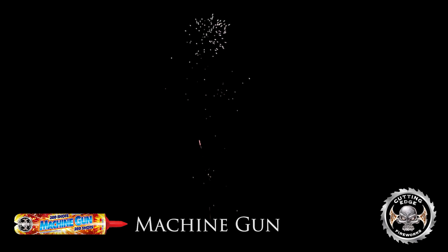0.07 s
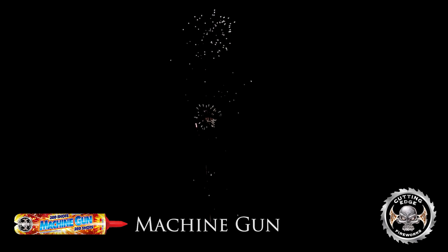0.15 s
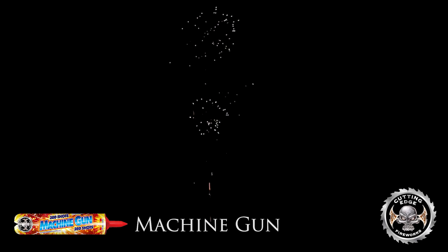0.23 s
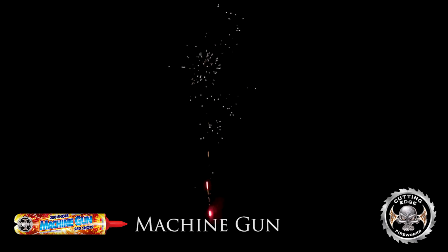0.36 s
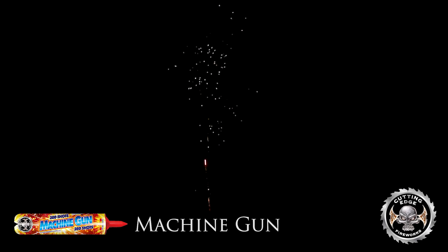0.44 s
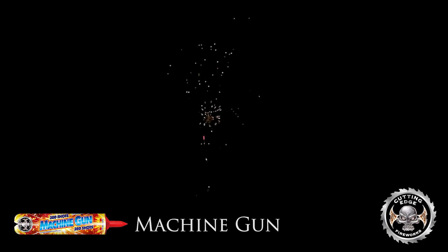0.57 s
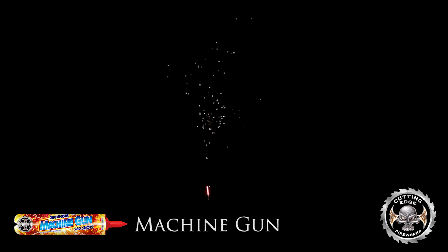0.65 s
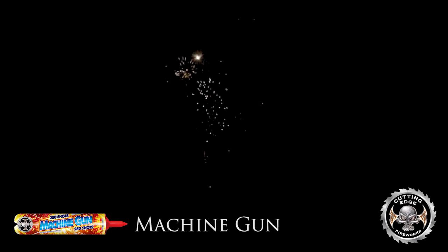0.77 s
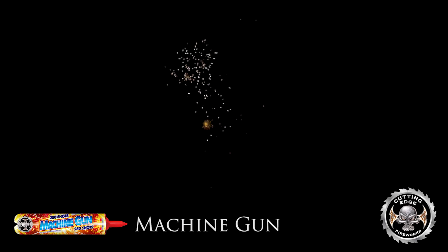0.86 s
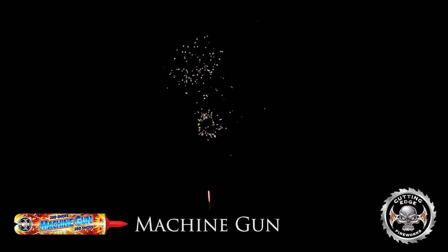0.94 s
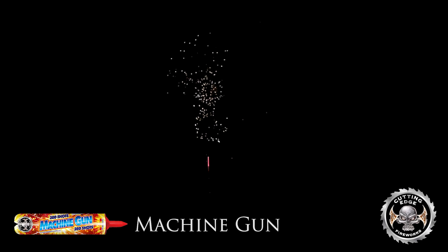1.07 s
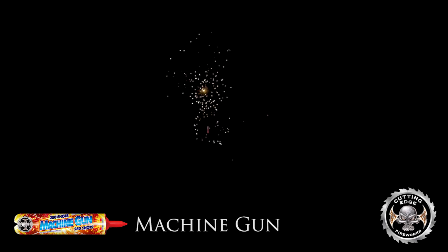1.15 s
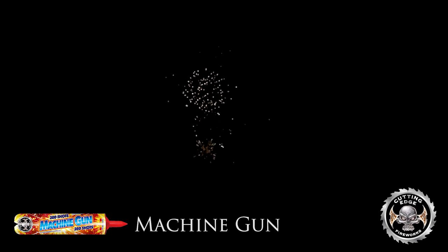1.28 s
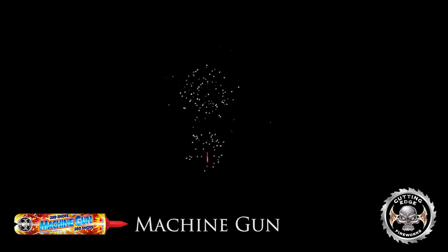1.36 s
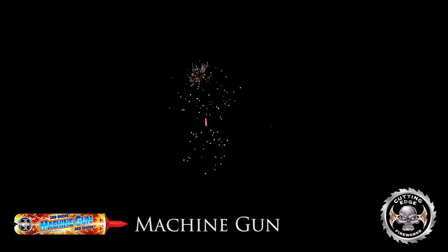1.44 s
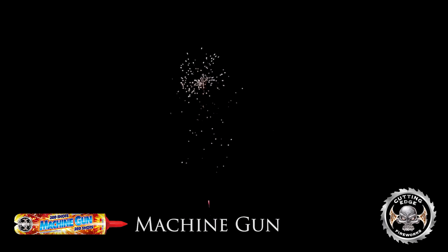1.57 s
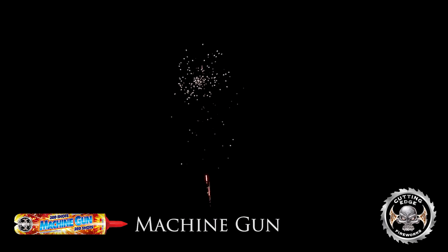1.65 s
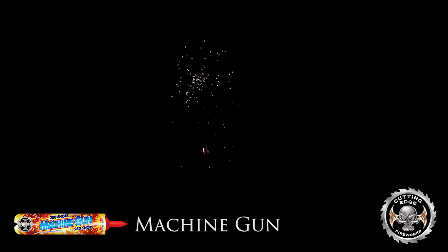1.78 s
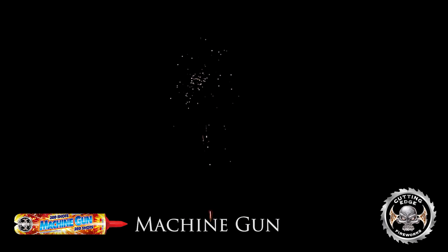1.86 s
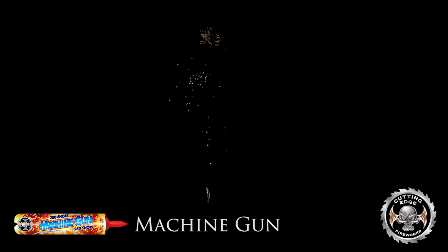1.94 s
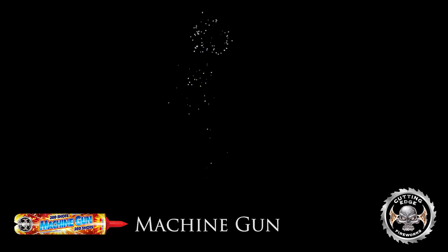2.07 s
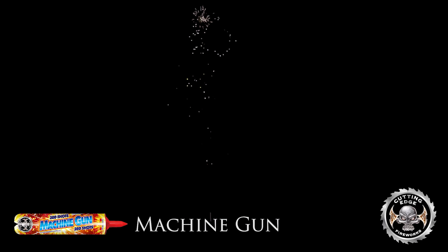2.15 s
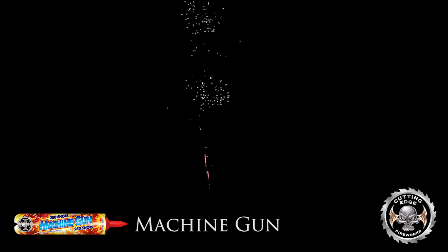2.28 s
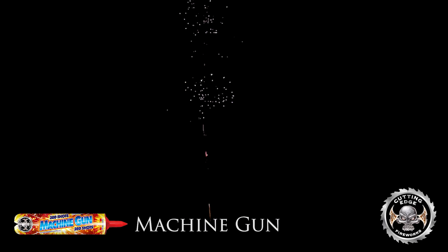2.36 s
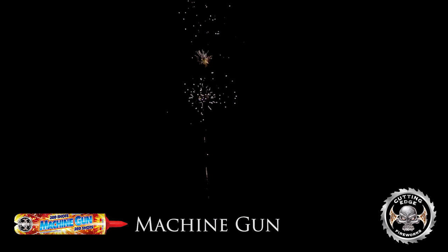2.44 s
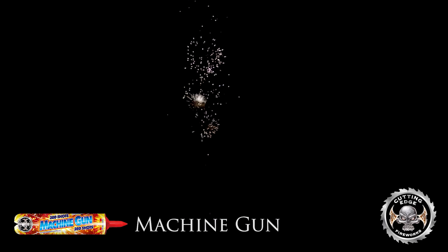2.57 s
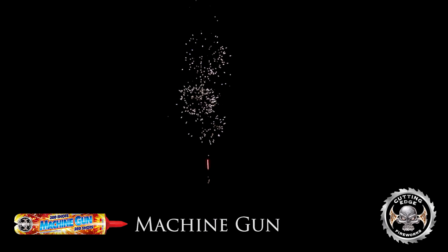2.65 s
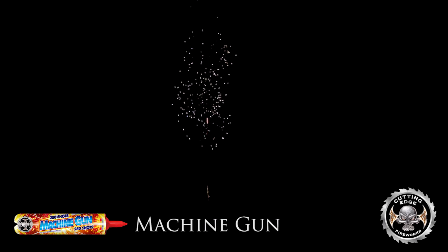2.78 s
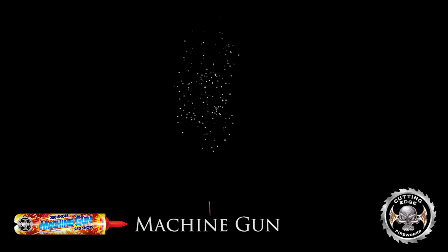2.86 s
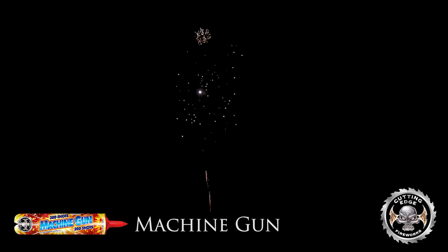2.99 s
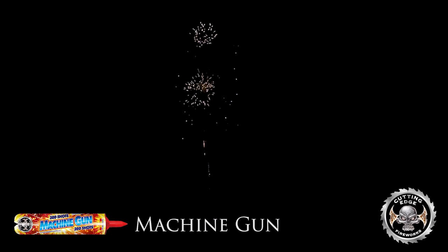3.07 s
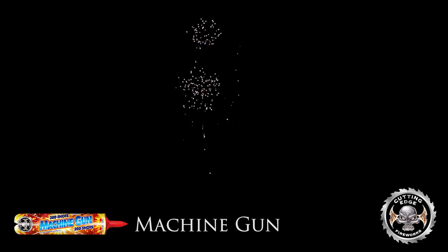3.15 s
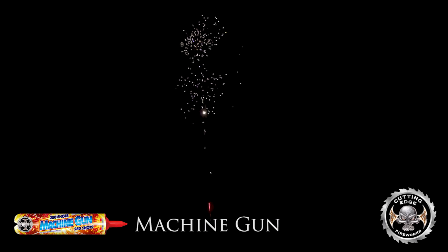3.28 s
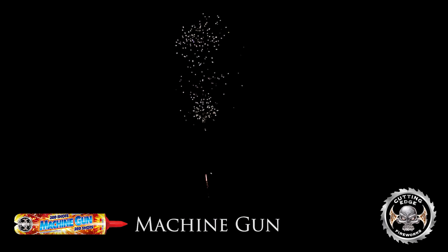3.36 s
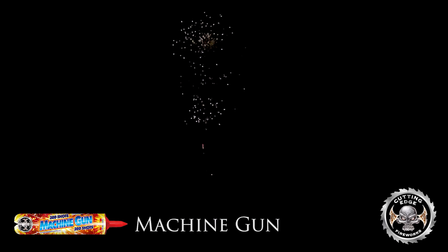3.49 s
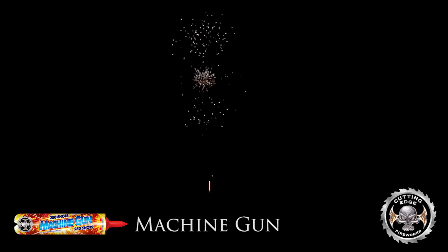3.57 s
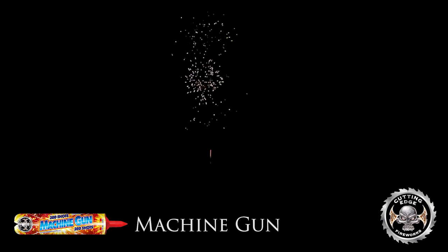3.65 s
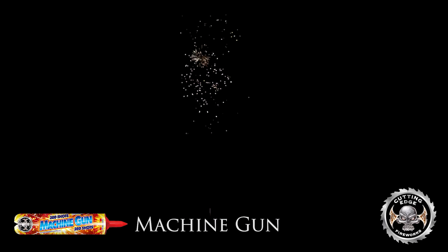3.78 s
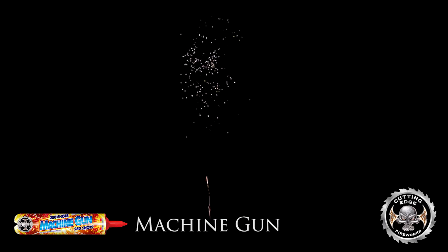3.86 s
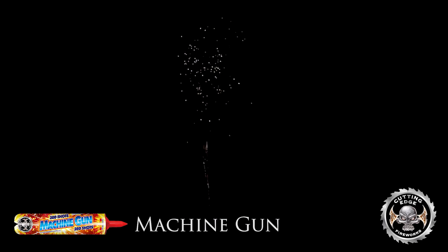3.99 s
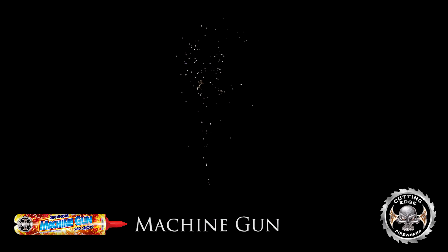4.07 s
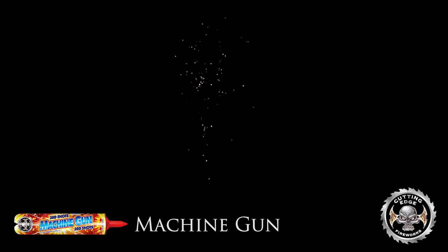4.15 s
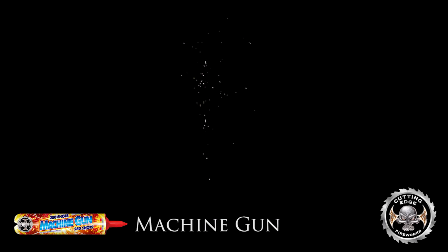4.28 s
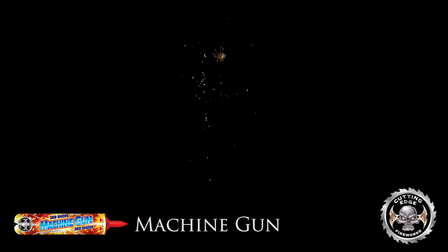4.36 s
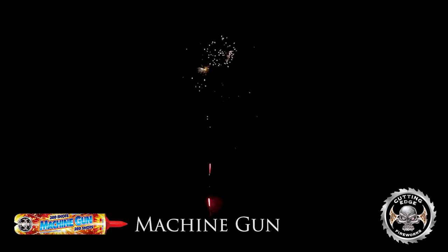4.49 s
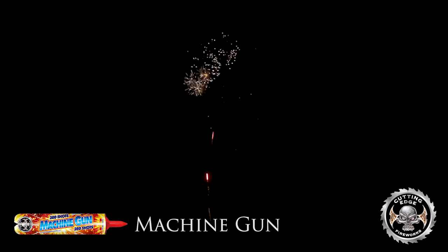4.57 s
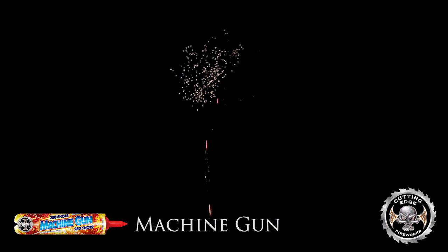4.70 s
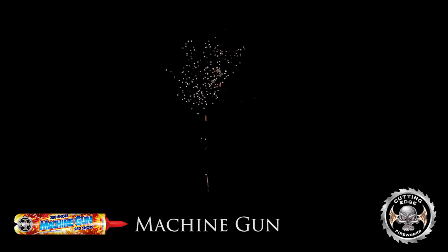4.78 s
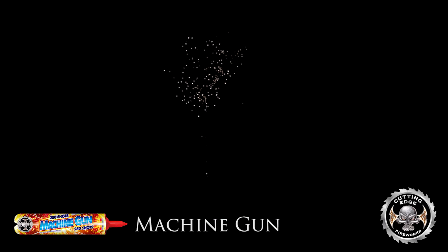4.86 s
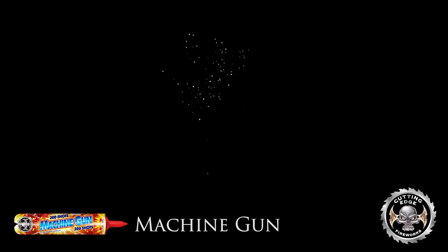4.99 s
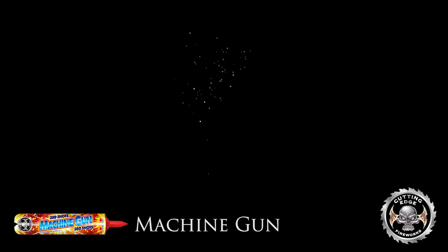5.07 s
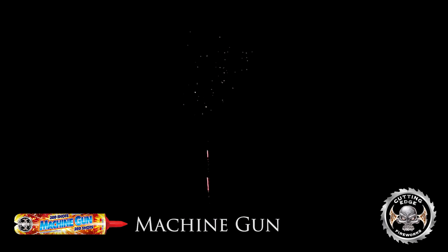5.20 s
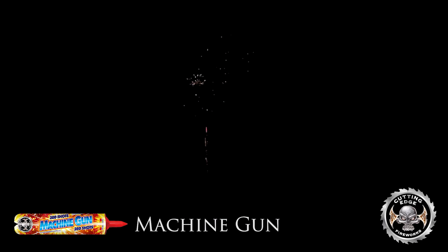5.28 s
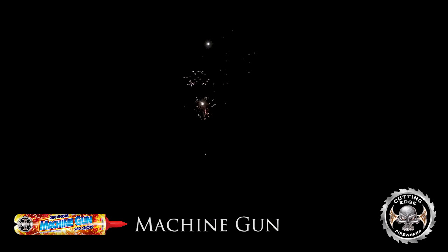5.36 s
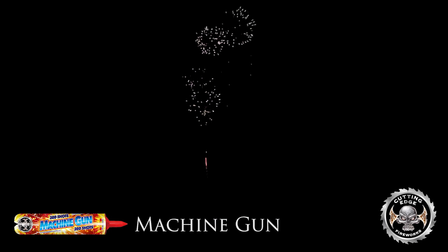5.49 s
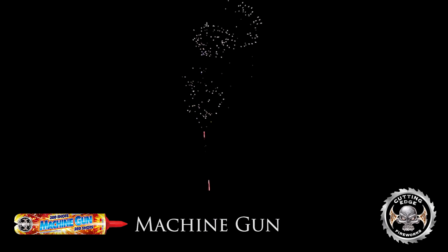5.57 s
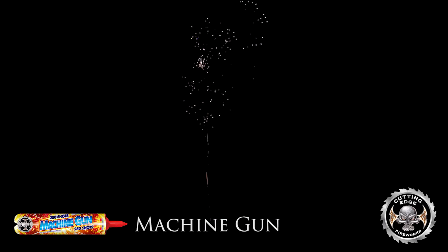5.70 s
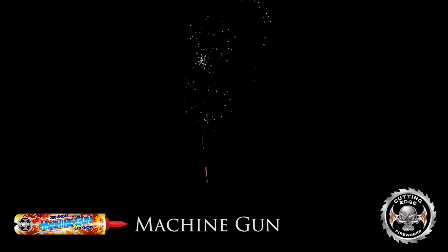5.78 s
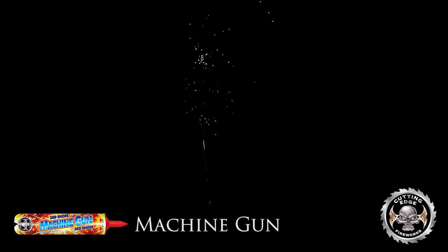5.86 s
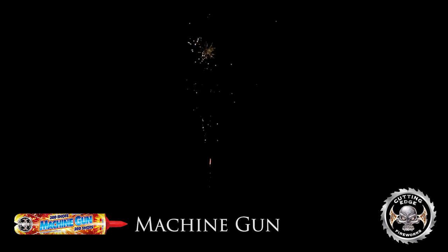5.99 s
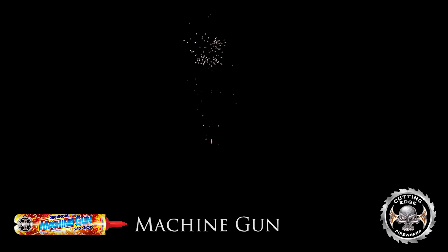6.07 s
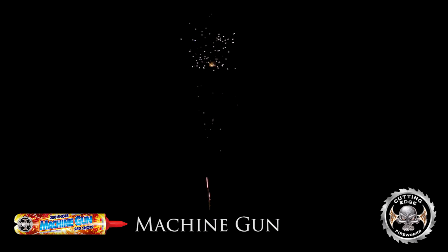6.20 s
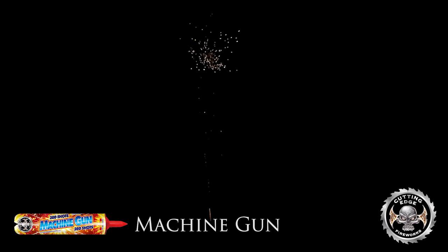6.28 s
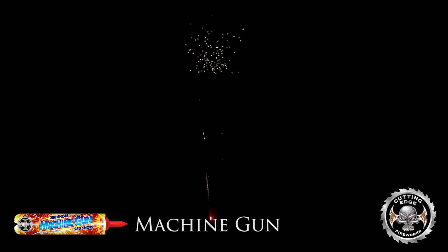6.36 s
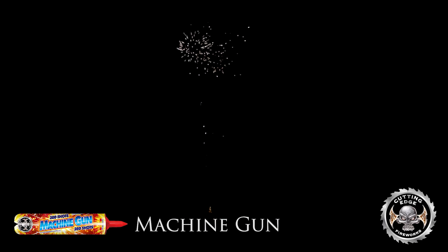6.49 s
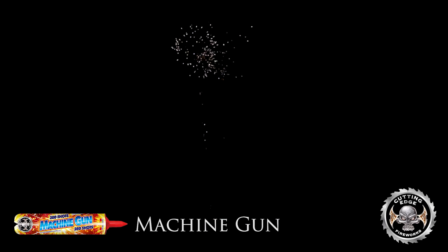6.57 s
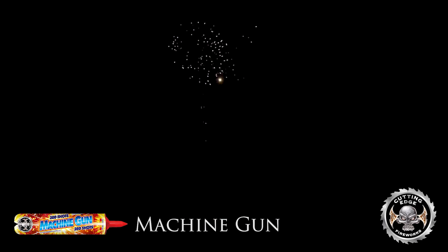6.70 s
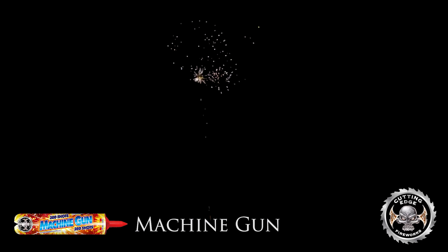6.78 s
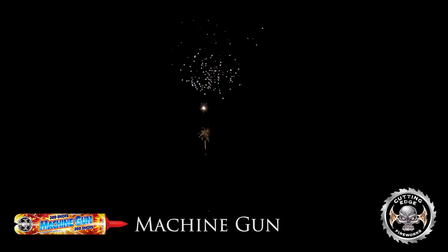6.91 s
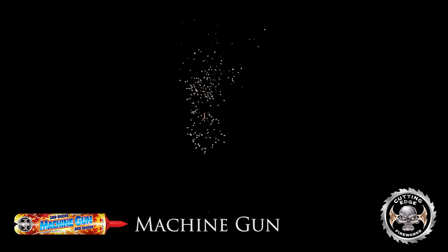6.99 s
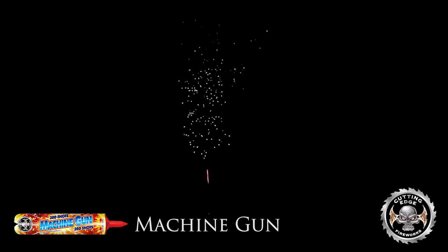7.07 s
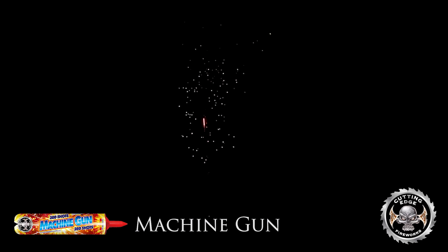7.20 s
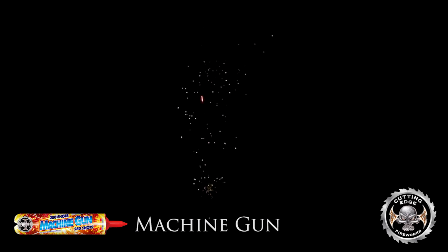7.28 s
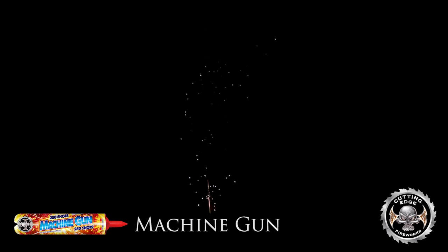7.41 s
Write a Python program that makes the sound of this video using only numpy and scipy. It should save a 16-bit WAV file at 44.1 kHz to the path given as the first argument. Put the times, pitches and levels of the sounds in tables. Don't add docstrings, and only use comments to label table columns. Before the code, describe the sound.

A rapid, uneven barrage of small firework bursts runs throughout, heard from fairly near in an open field with trees. Dull launching thumps and short hissing spits mix with sharp, clipped cracks, quick ground echoes and a short leafy tail. Fine crackle swells twice after bursts. Activity thins briefly around the middle and later, then continues to the end over faint insects and light wind buffeting.

```python
import sys
import numpy as np
from scipy import signal
from scipy.fft import rfft, irfft
from scipy.io import wavfile
from scipy.ndimage import uniform_filter1d

SR = 44100
rng = np.random.default_rng(int(sys.argv[2]) if len(sys.argv) > 2 else 0)


def digitize_waveform(pressure):
    field = np.atleast_2d(pressure).T
    bounded = np.clip(field, -1, 1)
    quanta = np.round(bounded * 32767).astype(np.int16)
    wavfile.write(sys.argv[1], SR, quanta)


def natural_amplitude(level_db):
    exponent = np.asarray(level_db, float) / 20
    return 10 ** exponent


N = 328104


def rms_one(x):
    return x / np.sqrt(np.mean(x ** 2) + 1e-20)


def coloured(x, spectrum):
    hz, db = np.transpose(spectrum)
    grid = np.arange(x.shape[-1] // 2 + 1) * SR / x.shape[-1] + 1
    gain = natural_amplitude(np.interp(np.log(grid), np.log(hz), db))
    return rms_one(irfft(rfft(x) * gain, x.shape[-1]))


def add(track, s, sound):
    at = max(int(round(s * SR)), 0)
    track[at:at + len(sound)] += sound[:N - at]


def peak(x, hz, width_hz):
    r = np.exp(-np.pi * width_hz / SR)
    poles = [1, -2 * r * np.cos(2 * np.pi * hz / SR), r * r]
    return signal.lfilter([(1 - r * r) / 2, 0, (r * r - 1) / 2], poles, x)


def drift(rate_hz):
    slow = signal.butter(2, rate_hz, fs=SR, output="sos")
    return rms_one(signal.sosfilt(slow, rng.standard_normal(N + SR))[SR:])


def grit(shape, per_s, spread_db):
    sizes = natural_amplitude(spread_db * np.minimum(rng.exponential(1, shape), 5)) * rng.choice([-1, 1], shape)
    return sizes * (rng.random(shape) < per_s / SR)


def shock(push_ms, suction, back_ms):
    ms = np.arange(300) / SR * 1000
    late = np.maximum(ms - push_ms, 0)
    push = np.minimum(1, ms / .04) * np.maximum(1 - ms / push_ms, 0)
    return push - suction * (1 - np.exp(-late / .07)) * np.exp(-late / back_ms)


# (frequency [Hz], level [dB])
NIGHT_COLOUR = [(30, -1), (70, -9), (110, -30), (300, -12.5), (600, -44), (2000, -12), (4000, -26),
                (9000, -18.5), (12500, -27), (15600, -16), (15800, -40), (16100, -70)]


def night_air():
    return natural_amplitude(-49) * coloured(rng.standard_normal(N), NIGHT_COLOUR)


def crickets():
    trill_db, buzz_db = -49.5, -45
    t = np.arange(N) / SR
    pulses = np.maximum(np.sin(2 * np.pi * 40 * t + 1.5 * drift(3)), 0) + .9
    one_voice = np.sin(2 * np.pi * 2640 * t + 3 * drift(20))
    many_voices = .8 * rms_one(peak(rng.standard_normal(N), 2630, 260))
    trill = rms_one(peak((one_voice + many_voices) * pulses, 2550, 280))
    strokes = (.5 + .5 * np.sin(2 * np.pi * 180 * t + 1.2 * drift(2.6))) ** 2 + 1.2
    rasp = rng.standard_normal(N) * strokes
    buzz = rms_one(peak(peak(peak(rasp, 6380, 1300), 6460, 2000), 6600, 2600))
    return natural_amplitude(trill_db + 0.78 * drift(0.83)) * trill + natural_amplitude(buzz_db + 0.21 * drift(10.0)) * buzz


# (time [s], level [dB])
GUSTS = [(0.0, -36.5), (0.33, -41), (0.76, -47.5), (0.99, -47), (2.05, -62), (3.13, -39), (3.479, -52),
         (4.56, -62), (4.79, -41), (4.99, -51), (5.16, -51), (5.37, -51), (5.49, -37), (5.88, -60),
         (6.48, -48.5), (6.78, -54), (7.19, -40), (7.44, -43)]
# (time [s], level [dB], frequency [Hz])
SLAPS = [
    (0.83, -29.5, 33.5),
    (7.33, -30, 47),
    (7.383, -20.5, 85.5),
    (7.39, -31, 190),
]


def wind():
    gust_db = np.interp(np.arange(N) / SR, *np.transpose(GUSTS))
    rumble = coloured(rng.standard_normal(N), [(8, 5.5), (25, -5.0), (60, -8.0), (120, -18.5), (400, -39.0)])
    out = natural_amplitude(gust_db + 9.56 * drift(7.7)) * rumble
    t = np.arange(6000) / SR
    for s, slap_db, hz in SLAPS:
        add(out, s, -natural_amplitude(slap_db + 2.0) * np.sin(2 * np.pi * hz * t) * np.exp(-t * hz / 2.0))
    return out


# (time [s], thump level [dB], spit level [dB], spit frequency [Hz], spit length [ms]); the faint
# row at 4.303 s only lays a soft thump and spit under a clump of pops
LIFT_CHARGES = [(0.039, -25, -36.5, 3530, 23), (0.1401, -21, -34, 1980, 11.3),
                (0.153, -22.5, -30, 1940, 8.5), (0.3312, -19.5, -27, 3600, 7.1),
                (0.405, -26, -38.5, 2300, 10), (0.4974, -27.5, -40, 2100, 19),
                (0.5317, -28, -33.5, 2250, 3.9), (0.854, -21.5, -32, 2080, 11),
                (1.1723, -19, -24, 3670, 3.9), (1.2404, -20.5, -26.5, 1840, 8.2),
                (1.53, -19.5, -27, 2420, 7.6), (1.788, -27, -41, 2400, 24), (1.855, -26.5, -36, 4770, 13),
                (1.866, -29, -36, 1920, 5),
                (2.1031, -28.5, -40, 2130, 24), (2.121, -25.5, -39, 2200, 24), (2.435, -22, -30, 4270, 11),
                (2.6154, -23, -26.5, 6400, 8.2), (2.643, -20, -25, 1730, 6.1),
                (2.8226, -25.5, -35, 1300, 6.7), (2.9462, -26, -34.5, 3970, 11),
                (3.106, -19, -24.5, 6100, 4.5), (3.176, -23.5, -28.5, 3970, 11),
                (3.225, -20, -28, 2150, 11), (3.7751, -23.5, -36, 2100, 12), (4.106, -21, -28.5, 1870, 7.1),
                (4.119, -24, -29, 6300, 11), (4.1835, -24.5, -26.5, 3770, 8.5), (4.303, -41, -42, 1700, 16),
                (4.665, -21.5, -28, 4460, 10.5), (4.716, -33, -39, 1300, 7.6),
               (4.8376, -24.5, -36, 3600, 8.3), (4.937, -22, -28.5, 3350, 5.3),
               (5.315, -21.5, -33, 3820, 11), (5.42, -17.5, -27.5, 1750, 7.9), (5.647, -32, -38, 2100, 5.6),
               (5.786, -21.5, -29.5, 2120, 8), (5.901, -22.5, -30, 2180, 13.3), (5.956, -23, -33, 3400, 10),
               (6.099, -24.5, -37.5, 1940, 11.6), (6.345, -23, -27.5, 2420, 2.2),
               (6.4073, -23.5, -23.5, 6330, 3.7), (6.54, -27, -34.5, 1970, 11),
               (6.552, -23, -31.5, 4530, 12), (7.0456, -22.5, -31, 2300, 8),
               (7.2723, -18, -30.5, 2030, 8.9)]
ALL_LIFTS = LIFT_CHARGES
# (delay after spit [ms], ground bounce lag [ms], bounce level [dB], direct level [dB])
LIFT_PUSHES = [(1.8, 3.0, -4.0, 4.9), (0.8, 4.4, -1.8, 3.7), (0.6, 5.9, -5.3, 2.2), (0.5, 3.6, -2.5, 4.9),
               (-0.9, 8.0, -0.8, 3.8), (1.4, 5.2, -3.1, 4.3), (0.5, 4.4, 1.5, 4.1), (-0.5, 7.1, -3.1, 3.2),
               (0.5, 5.4, -9.6, 4.1), (-0.7, 5.5, -2.8, 3.7), (-1.1, 9.0, -7.8, 3.4),
               (-0.0, 7.5, -4.3, 1.9), (0.0, 4.9, 0.6, 1.9), (-0.1, 6.0, -1.2, 3.7), (-0.3, 6.1, -8.7, 4.6),
               (-0.7, 5.0, -5.3, 1.1), (0.5, 5.5, -7.3, 5.3), (-0.2, 5.3, -2.3, 4.6), (1.2, 3.0, -7.9, 4.7),
               (0.7, 4.8, -12.3, 6.1), (-0.7, 3.5, -3.0, 3.8), (0.5, 6.5, -12.4, 4.3),
               (-1.6, 3.0, 2.1, 0.8), (0.3, 5.1, -8.7, 4.7), (0.1, 5.1, 0.3, 4.0), (-0.3, 4.3, -6.8, 3.9),
               (-0.8, 6.2, -9.2, 2.0), (-1.4, 3.7, 0.2, 4.0), (0.0, 3.7, -1.7, -2.0),
               (-0.1, 5.6, -5.8, 4.0), (-2.0, 4.4, -3.0, 0.4), (0.6, 3.7, -3.8, 2.2), (1.1, 6.6, -9.3, 4.4),
               (-0.0, 4.9, -3.0, 3.9), (1.2, 3.0, -7.4, 4.9), (-1.8, 3.3, -0.6, 5.3),
               (-0.0, 3.9, -7.7, 4.7), (0.2, 5.6, -0.9, 3.7), (-0.2, 6.1, -5.7, 4.9), (2.0, 5.5, -5.3, 2.9),
               (-0.3, 5.2, -7.8, 3.2), (-1.2, 5.7, -0.8, 4.3), (-2.0, 7.3, -2.6, 0.2),
               (-0.8, 3.8, -4.3, -2.0), (0.3, 3.0, -19.0, 4.4), (0.9, 5.8, -8.4, 4.3)]
# (lag [ms], level [dB])
WALL_RETURNS = [(10.1, -5.6), (10.4, 4.8), (11.4, -1.1), (12.2, -9.5), (13.6, -7.3), (8.8, -2.5),
                (10.3, -3.5), (13.2, -6.8), (10.8, -4.6), (11.3, -20.0), (11.7, -2.2), (10.8, 1.0),
                (16.0, -20.0), (9.4, 0.1), (9.7, -5.0), (9.3, -3.4), (8.3, -2.8), (11.2, -12.3),
                (9.1, -8.4), (12.0, -10.3), (9.2, -0.6), (11.6, -4.5), (8.7, 1.4), (11.8, -12.5),
                (14.7, -20.0), (11.7, -1.8), (13.2, -8.1), (14.7, -4.3), (8.0, 0.4), (13.1, -8.6),
                (10.8, -2.3), (11.3, -13.7), (10.1, -4.1), (10.2, -7.2), (9.8, -11.1), (10.7, 6.0),
                (12.1, -6.3), (11.7, -20.0), (12.9, -6.9), (11.3, -9.1), (9.8, -3.7), (14.9, -16.1),
                (12.7, 6.0), (12.1, -17.4), (11.2, -4.8), (10.9, -7.3)]
# (frequency [Hz], level [dB])
SPARK_COLOUR = [(300, -23), (900, 1.5), (2000, 6.5), (3800, 4), (6500, 1), (9000, -4.5), (16000, -15.5)]


def lifts():
    push_ms, lead_ms = 1.394, 5
    out = np.zeros(N)
    ms = np.arange(9000) / SR * 1000 - lead_ms
    heave = 0.55 * np.sin(2 * np.pi * (ms - 4) / 27) * np.exp(-((ms - 14) / 12) ** 2)
    swing = (ms - 1.4) / (push_ms * np.where(ms < 1.4, .8, 1.1))
    push = -swing * np.exp(.5 - swing ** 2 / 2) * np.where(swing < 0, .85, 1.15)
    wall_push = uniform_filter1d(push, size=133)
    shape = (len(ALL_LIFTS), len(ms))
    rolls = coloured(rng.standard_normal(shape), [(30, -19), (70, -2), (200, 10.0), (330, 3), (600, -48)])
    rolls = 0.12 * rolls * np.clip(ms / 8, 0, 1) * np.exp(-ms / 30)
    sparks = coloured(grit(shape, per_s=12000, spread_db=2.1), SPARK_COLOUR)
    for lift, pushed, wall, spit, roll in zip(ALL_LIFTS, LIFT_PUSHES, WALL_RETURNS, sparks, rolls):
        s, thump_db, spit_db, spit_hz, spit_ms = lift
        late_ms, bounce_ms, bounce_db, push_db = pushed
        wall_ms, wall_db = wall
        fading = 1.24 * np.clip((spit_ms - ms) / 2.5, 0, 1) + 1.09 * np.exp(-ms / 7) + 0.14 * np.exp(-ms / 60)
        flare = np.clip((ms + 2.06) / 3, 0, 1) ** 2 * fading
        gap = 1 - .55 * np.exp(-((ms - .55 * spit_ms) / .9) ** 2)
        whistle = spit + 1.1 * peak(spit, spit_hz, 590) + 0.6 * peak(spit, 2.1 * spit_hz, 560)
        start = s - lead_ms / 1000
        add(out, start, natural_amplitude(thump_db) * (heave + roll) + natural_amplitude(spit_db) * flare * gap * whistle)
        start += late_ms / 1000
        add(out, start + bounce_ms / 1000, natural_amplitude(thump_db + bounce_db) * push)
        add(out, start, natural_amplitude(thump_db + push_db) * push)
        add(out, start + wall_ms / 1000, natural_amplitude(thump_db + wall_db) * wall_push)
    return out


# (time [s], peak level [dB])
LONE_POPS = [(0.066, -20), (1.2084, -19), (1.4636, -17), (1.602, -18), (1.783, -16), (1.8141, -13),
             (1.8293, -9), (1.9709, -22), (2.0185, -20), (2.0538, -22), (2.1337, -19), (2.8761, -16),
             (3.035, -22), (3.0615, -20), (3.6573, -19), (3.8584, -10), (4.214, -19), (4.3819, -20),
             (4.7191, -23), (5.0452, -21), (5.1168, -22), (5.1318, -22), (5.1761, -23), (5.8912, -15),
             (5.9251, -18), (6.546, -18), (6.9141, -19), (7.386, -21),
             (0.2173, -23), (0.5704, -18), (5.8894, -19), (1.2002, -20), (1.8246, -20), (2.0442, -25),
            (2.6319, -20), (3.1913, -20), (3.714, -22), (4.3057, -14), (4.3069, -18), (4.3098, -19),
            (4.3116, -16), (4.3086, -21), (4.3735, -27), (4.365, -27), (4.4244, -28), (4.4967, -25),
            (5.21, -25), (5.2258, -25), (5.35, -25), (5.9906, -25), (6.0826, -25), (6.1247, -25),
            (6.163, -26), (6.2044, -22), (6.473, -19)]


def embers(crackle_db):
    strays = np.abs(grit(N, per_s=1200, spread_db=2.2))
    clicks = 3 * natural_amplitude(crackle_db) * rms_one(strays)
    band = signal.butter(2, [660, 4540], "band", fs=SR, output="sos")
    clicks = signal.sosfilt(band, clicks)
    for s, peak_db in LONE_POPS:
        add(clicks, s - .00005, np.array([natural_amplitude(peak_db + 5)]))
    pops = np.convolve(clicks, shock(.09, suction=.9, back_ms=.12)[:80])[:N]
    bounce = np.convolve(clicks, shock(0.05, suction=0.17, back_ms=0.18)[:80])[:N]
    return pops + natural_amplitude(-6) * np.roll(bounce, round(0.0032 * SR))


# (time [s], peak level [dB])
MUZZLE_SNAPS = [(0.1466, -15), (0.3356, -8), (0.5376, -18), (1.1753, -14), (1.2453, -12), (1.5335, -14),
                (2.6211, -12), (2.6464, -7), (3.1103, -14), (3.1827, -11), (3.2318, -12), (4.1866, -11),
                (4.8423, -14), (5.4254, -11), (5.7907, -14), (5.9068, -11), (5.963, -18), (6.4132, -12),
                (6.5576, -13), (7.0506, -12)]


def snaps():
    clicks = np.zeros(N)
    for s, peak_db in MUZZLE_SNAPS:
        add(clicks, s - .00005, natural_amplitude(peak_db + 2.5) * shock(.09, suction=.9, back_ms=.1))
    return clicks + 0.72 * peak(clicks, 1500, 900)


# (time [s], suction level [dB], crack level [dB], ground bounce lag [ms], falling dust level [dB])
STAR_BURSTS = [(0.2239, -15.5, -8, 3.63, -29.5), (0.3788, -12, -15, 2.47, -28),
               (0.5724, -11, -3.5, 3.43, -24.5), (0.7845, -16, -2.5, 2.55, -36),
               (0.9531, -10.5, -9.5, 2.9, -38), (0.9992, -15, -5, 3.2, -43), (1.0503, -12, -7, 3.5, -35),
               (1.1164, -16, -8.5, 2.3, -31), (1.2666, -12, -24, 2.86, -27), (1.4166, -9.5, -6, 3.07, -33),
               (1.5105, -11, -7.5, 1.94, -23), (1.6887, -11.5, -3.5, 3.26, -33),
               (1.7729, -24, -14, 2.8, -37),
               (2.1653, -17, -3, 3.16, -28), (2.1905, -10, -13, 3.7, -44), (2.4052, -14, -4, 3.84, -34),
                 (2.4465, -13, -5.5, 2.93, -31), (2.6643, -12.5, -17, 2.7, -33), (2.703, -13, -8, 3.4, -37),
                 (2.7931, -13, -10, 2.38, -34), (2.8266, -12.5, -13, 2.7, -26.5),
                 (3.211, -17, -14, 3.54, -63), (3.2765, -11.5, -21, 2.9, -36),
                 (3.3135, -14, -8, 3.07, -31.5), (3.4986, -11, -8.5, 3.6, -33.5), (3.5534, -19, -4, 3, -33),
                 (3.724, -12.5, -6, 3.7, -46), (3.782, -16.5, -13, 2.85, -32.5),
                 (3.8176, -13, -1, 3.2, -36), (4.0251, -11, -15, 3.5, -27.5),
               (4.5193, -16.5, -14.5, 3.47, -43), (4.6129, -15.5, -9, 3.1, -36),
                (4.7591, -12, -12, 3.2, -33), (4.8006, -11, -5.5, 3.06, -45), (4.8227, -13, -4.5, 3.1, -40),
                (4.8285, -19, -21, 2.5, -48), (4.8831, -10.5, -22, 3.27, -24.5),
                (5.4877, -17.5, -16.5, 2.95, -64), (5.5748, -12.5, -9, 2.63, -41),
                (5.641, -18, -9, 2.6, -54), (5.658, -19, -20, 3.5, -59), (5.6737, -10.5, -12, 3.76, -26.5),
                (6.1894, -16.5, -10, 3.6, -29.5), (6.2368, -12.5, -10, 3.5, -38),
                (6.4626, -22.5, -12, 3.2, -53), (6.4971, -12.5, -13, 3.47, -36),
                (6.7095, -12, -11, 3.7, -30), (6.7999, -12.5, -8, 3.33, -55),
                (6.8186, -16.5, -23, 3.45, -26), (6.9733, -15, -16, 3.03, -49),
                (7.0387, -12.5, -15, 3.14, -34), (7.1631, -12.5, -13, 2.28, -41),
                (7.1784, -17, -11, 2.64, -42), (7.2043, -13, -16, 2.96, -27), (5.8648, -29, -16, 3.1, -40),
                (5.9186, -32, -17, 3.3, -66)]
ALL_BURSTS = STAR_BURSTS
GROUND_LEVELS = [1.5, 3, 3.5, 1.5, -1, -10, -.5, -3.5, 2, -4, -.5, -.5, -4.5, -.5, -.5, 1, -.5, 1.5, -2,
                 1.5, -2, 4, 2, 1.5, 0.5, -5.5, -2, 2, -.5, -1.5, -4, -6, 0.5, -3, -2, -7, -1, -3.5, -2, -3,
                 6, 1, -2, 0.5, -1, 4, -.5, 5, -2.5, 3, -1, 3.5, -.5, -.5, -3, -3]


def bursts():
    ring_db = -5.5
    out = np.zeros(N)
    t = np.arange(200) / SR
    chatter_fade = np.exp(-np.maximum(t - .0003, 0) / .00009) + .14 * np.exp(-t / .0012)
    chatter_shape = np.minimum(1, t / 0.000094) * chatter_fade
    soft_shock = signal.lfilter([.6], [1, -.45], shock(.25, suction=.16, back_ms=.7))
    for (s, suction_db, crack_db, lag_ms, _), ground_db in zip(ALL_BURSTS, GROUND_LEVELS):
        size = natural_amplitude(suction_db + 11)
        add(out, s + .0002, 1.235 * size * shock(0.14, suction=0.44, back_ms=0.53))
        near = size ** .7 * shock(.15, suction=.6, back_ms=.15)
        add(out, s + .0021, .2 * near + .4 * peak(near, 2100, 1300))
        add(out, s + lag_ms / 1000 + .00002, natural_amplitude(ground_db) * size ** .7 * soft_shock)
        noise = rng.standard_normal(200)
        chatter = noise / np.std(noise[:20]) * chatter_shape
        crack = natural_amplitude(crack_db + 3.0) * peak(chatter, 11400, 6300)
        ring = natural_amplitude(crack_db + ring_db + 15.5) * peak(peak(chatter, 6300, 4500), 6200, 4500)
        add(out, s - .00005, crack + ring)
    return out


# (frequency [Hz], level [dB])
TREE_COLOUR = [(150, -0.5), (400, -8.5), (800, -14), (1300, -6.5), (2130, -1.5), (4600, 5), (6400, 2.5),
               (9000, 6), (14600, -6), (16000, -29)]


def scatter():
    level_db, fade_ms = -36.5, 173
    blast_share, dust_share = 0.26, 0.18
    out = np.zeros(N)
    ms = np.arange(18000) / SR * 1000
    leaves = coloured(grit((len(ALL_BURSTS), len(ms)), per_s=16000, spread_db=2.0), TREE_COLOUR)
    dull = signal.sosfilt(signal.butter(2, 6500, fs=SR, output="sos"), leaves)
    fading = np.exp(-ms / fade_ms) + 1.7 * np.exp(-ms / 6) + 0.075 * np.exp(-ms / 200)
    shape = np.minimum(1, ms / 3) * fading
    for (s, suction_db, *_, dust_db), whole, low in zip(ALL_BURSTS, leaves, dull):
        heard = low + (whole - low) * np.exp(-ms / 220)
        burst_db = level_db + blast_share * (suction_db + 4.5) + dust_share * (dust_db + 31.0) + 2.0
        add(out, s + 0.00095, natural_amplitude(burst_db) * shape * heard)
    return out


# (level [dB], delay before it catches fire [ms], second flare level [dB])
DUST_CLOUDS = [(-31, 33, -2), (-35, 33, -1), (-26.5, 42, -2.5), (-32, 32, -4), (-25.5, 36, -2),
               (-45.8, 40, -7), (-27.5, 40, -9), (-44, 47, 7), (-39, 27, 0.5), (-29, 37, -9),
               (-29, 44, -2.5), (-33, 19, -1.5), (-39, 18, -18), (-32, 61, -5), (-32, 56, -6),
               (-33.5, 17, -6), (-31, 39, -3.5), (-32, 29, -1.5), (-38, 38, 3), (-31.5, 64, -12),
               (-35.5, 49, 4.5), (-43, 27, -2.9), (-34.5, 26, -2), (-35, 46, -0.9), (-28.5, 26, -4.5),
               (-34, 29, -3.5), (-33, 27, -7), (-40, 23, -2.4), (-29.5, 30, -7), (-36.5, 37, 1),
               (-55, 41, 5), (-58.1, 38, -3.0), (-32.5, 44, 1), (-49.0, 40, -3.2), (-48.2, 39, -3.0),
               (-37.5, 41, 8), (-31.5, 59, -5.5), (-62, 37, -10), (-30.5, 27, 2), (-50.1, 39, -3.0),
               (-26, 61, -10), (-31, 75, -1), (-33.5, 74, -3), (-35, 30, -4), (-52.1, 42, -3.0),
               (-37, 34, 1.5), (-27, 29, -4.5), (-27.5, 52, -8), (-33, 76, -7), (-54, 37, -3.0),
               (-35.5, 35, 0), (-31, 42, -9), (-30, 57, -2), (-36.5, 36, -10.2), (-38, 20, -7),
               (-50, 30, -9)]
# (frequency [Hz], level [dB])
DUST_COLOUR = [(300, -5.5), (700, -10.5), (1300, 1.5), (2200, 3), (4500, 1.5), (6500, 2.5), (9000, -6),
               (16000, -15.5)]


def swell(late_ms, length_ms):
    rising = np.exp(-(late_ms / (.5 * length_ms)) ** 2)
    thinning = 1 / np.cosh(late_ms / (0.86 * length_ms))
    return np.where(late_ms < 0, rising, thinning)


def clouds():
    first_ms, relight_ms, relight_lag_ms = 18.7, 18.5, 43.5
    power = np.zeros(N)
    ms = np.arange(12000) / SR * 1000
    for (s, *_), (dust_db, lag_ms, relight_db) in zip(ALL_BURSTS, DUST_CLOUDS):
        first = swell(ms - lag_ms, first_ms)
        second = natural_amplitude(relight_db) ** 2 * swell(ms - lag_ms - relight_lag_ms, relight_ms)
        add(power, s, natural_amplitude(dust_db - 1) ** 2 * (first + second))
    dust = grit(N, per_s=9000, spread_db=2.4) * natural_amplitude(2.5 * drift(90))
    return np.sqrt(power) * coloured(dust, DUST_COLOUR)


def afterglow():
    steady_db, falling_db, peak_ms = -64.5, -23, 80
    power = np.full(N, natural_amplitude(2 * steady_db))
    age = np.arange(SR) / SR * 1000 / peak_ms
    for s, *_, dust_db in ALL_BURSTS:
        add(power, s, natural_amplitude(2 * (dust_db + falling_db)) * age * np.exp(1 - age))
    return 10 * np.log10(power)


def scene():
    night = night_air() + crickets() + wind()
    candle = lifts() + snaps()
    stars = bursts() + scatter() + clouds() + embers(afterglow())
    return (night + candle + stars)[None]


def band_limit(x):
    return signal.sosfilt(signal.butter(12, 16970, fs=SR, output="sos"), x)


def record(dry):
    overload = .365
    x = signal.sosfilt(signal.butter(1, 15, "high", fs=SR, output="sos"), dry)
    x = signal.sosfiltfilt(signal.cheby2(16, 30, 16050, fs=SR, output="sos"), x)
    x = np.clip(x, -overload, overload)
    x = signal.sosfiltfilt(signal.cheby2(12, 40, 16750, fs=SR, output="sos"), x)
    return band_limit(x)


dry = scene()
out = record(dry)
digitize_waveform(out)
```